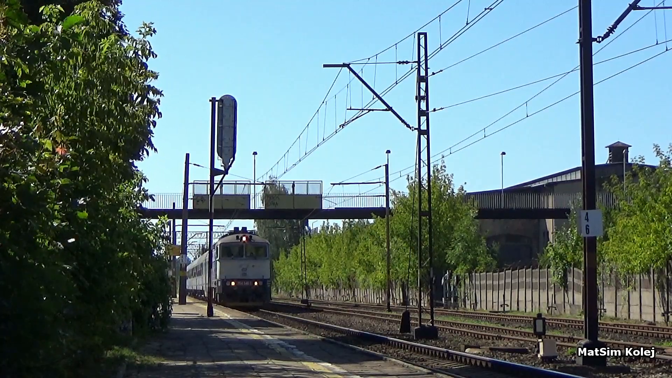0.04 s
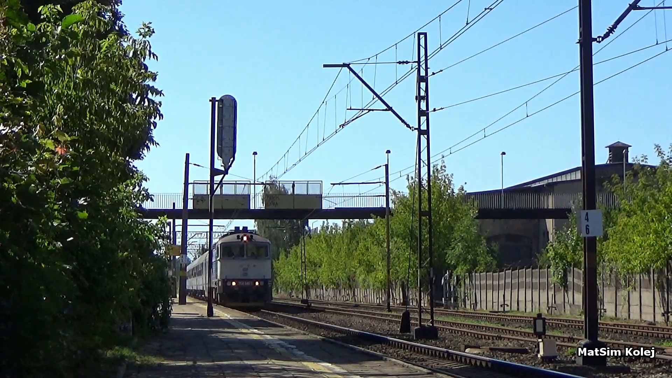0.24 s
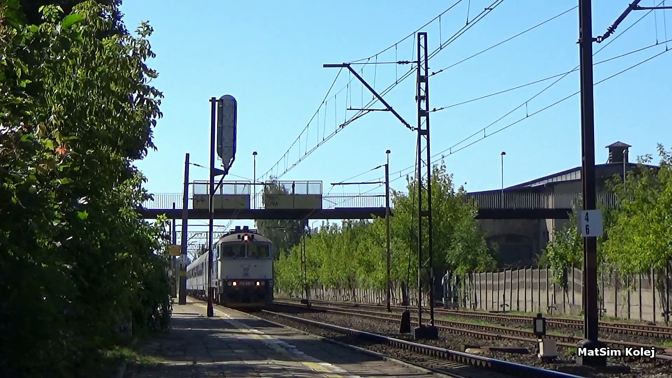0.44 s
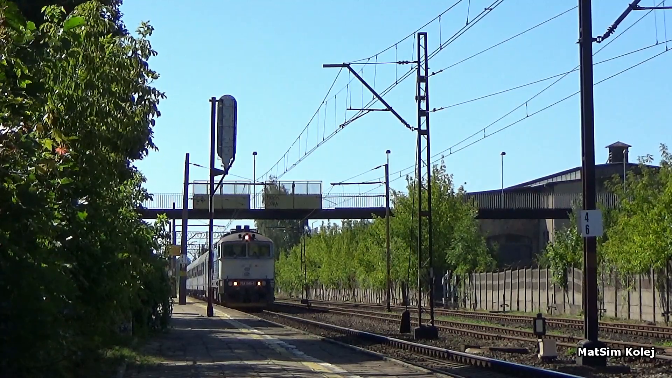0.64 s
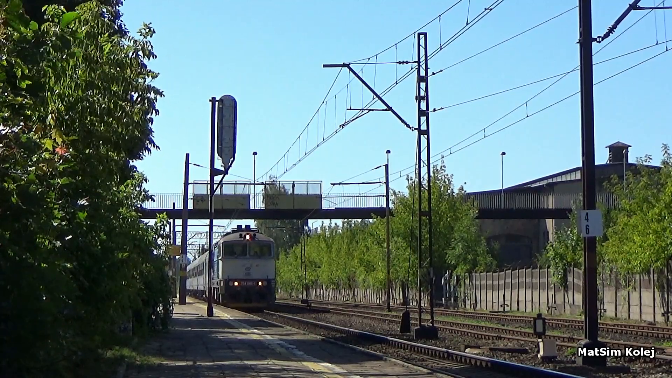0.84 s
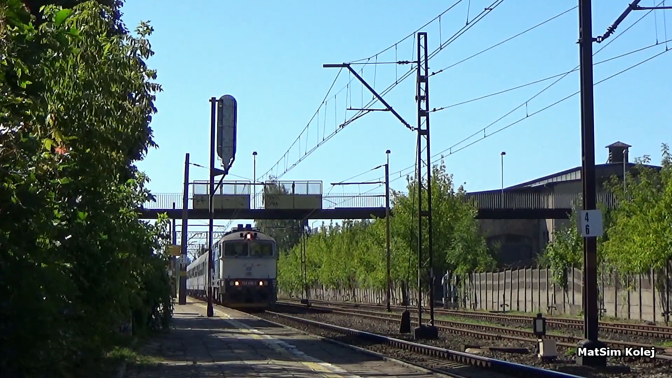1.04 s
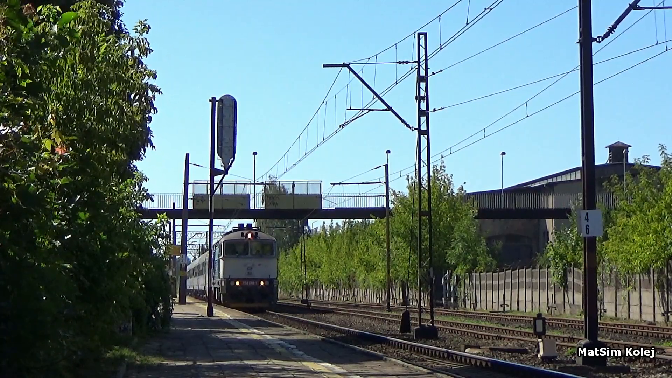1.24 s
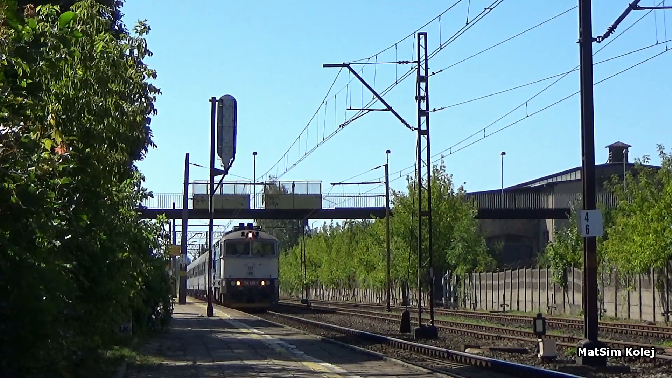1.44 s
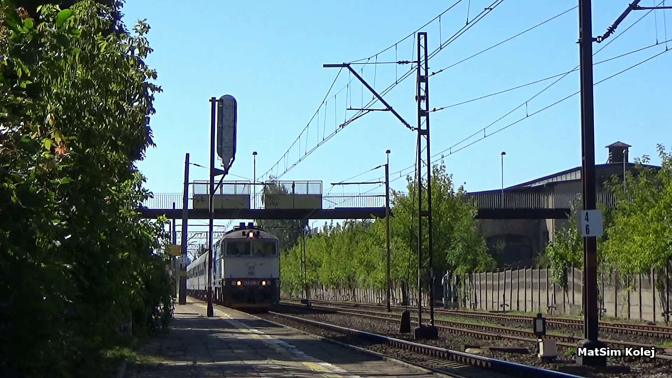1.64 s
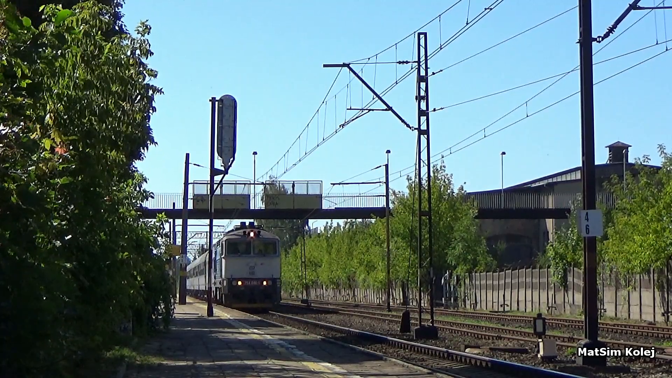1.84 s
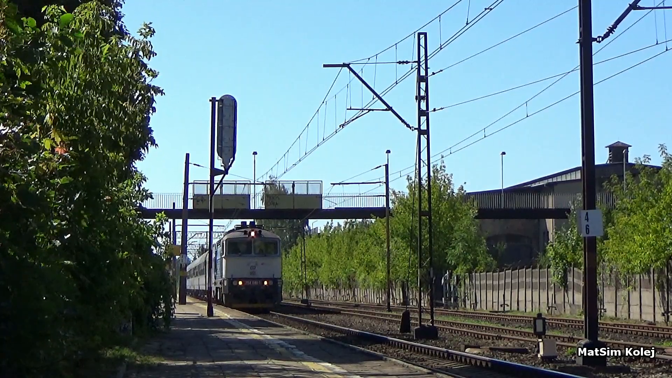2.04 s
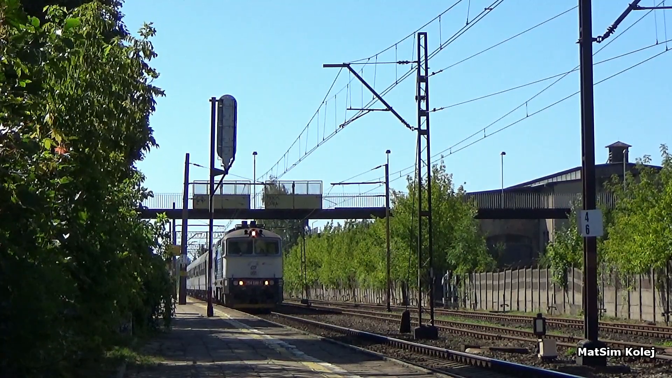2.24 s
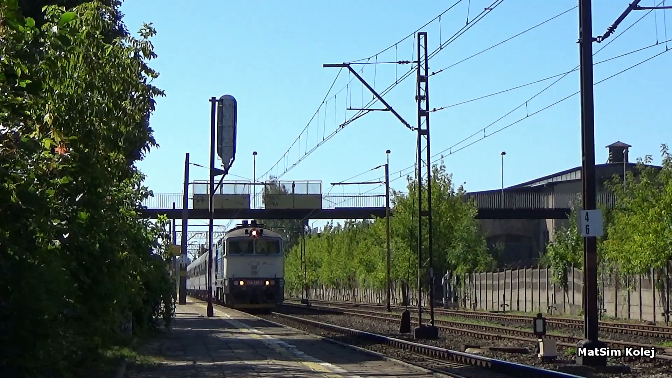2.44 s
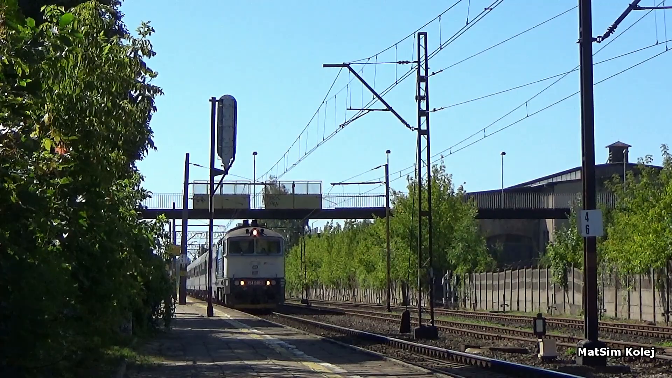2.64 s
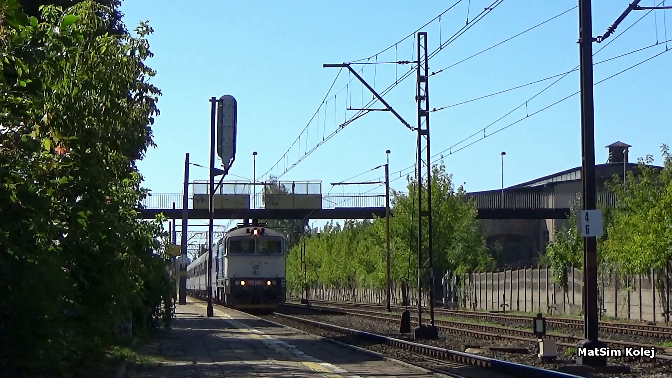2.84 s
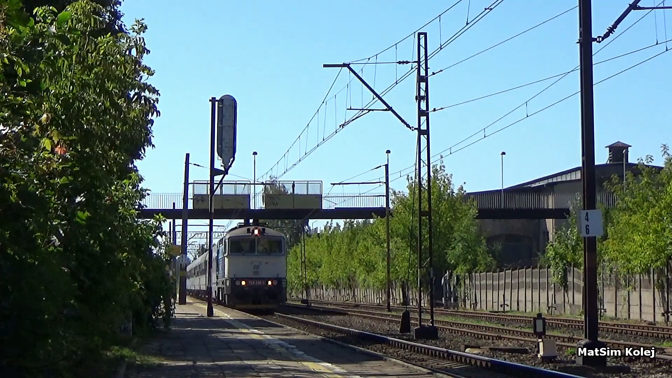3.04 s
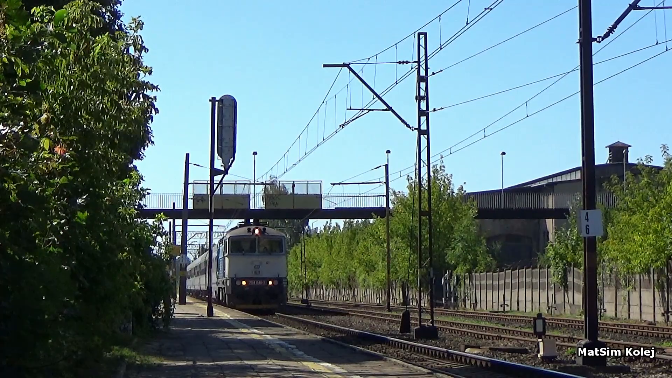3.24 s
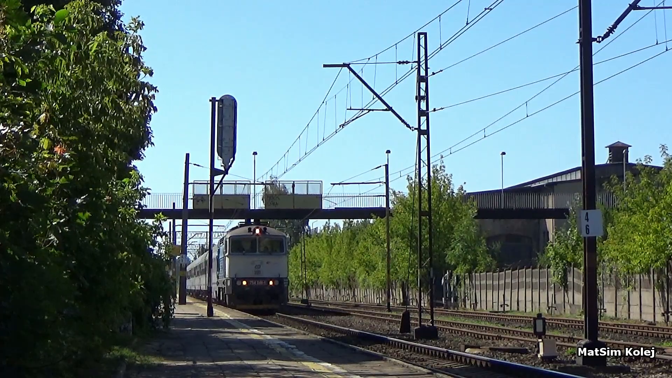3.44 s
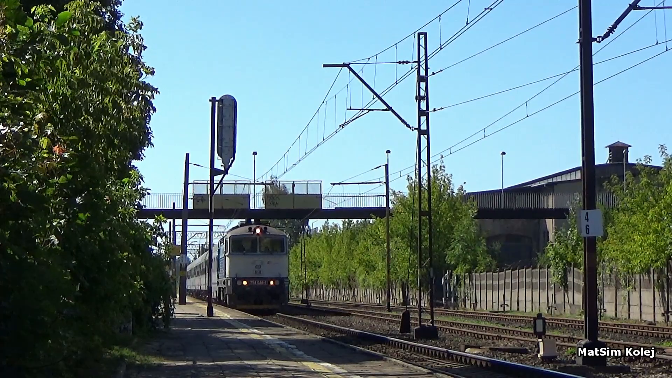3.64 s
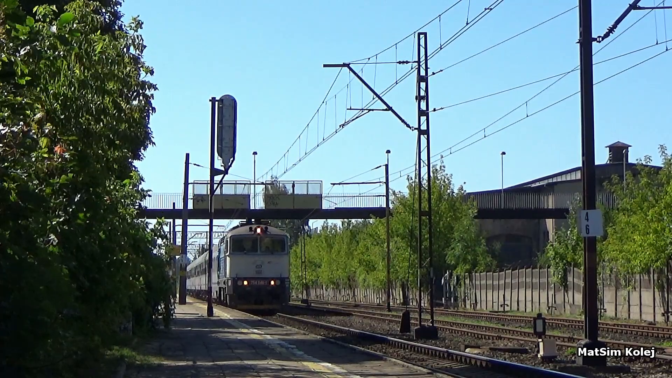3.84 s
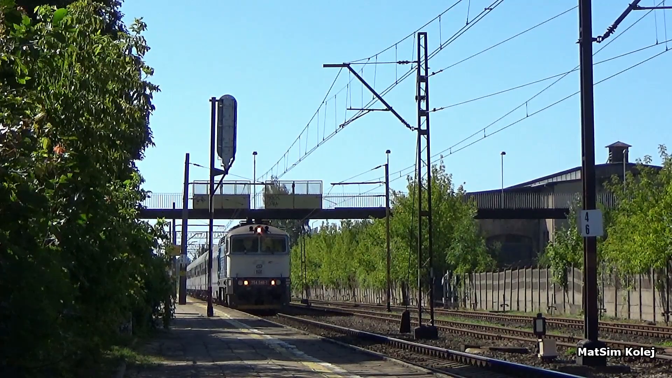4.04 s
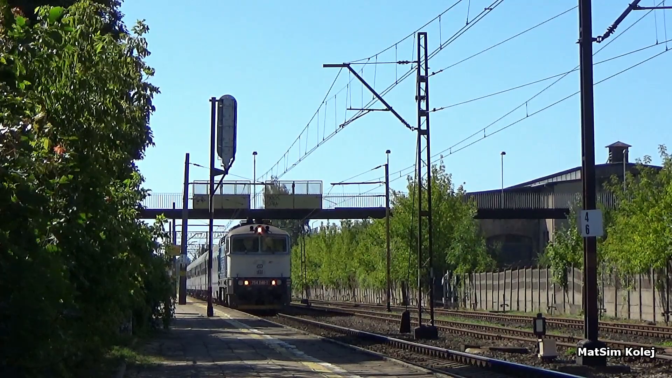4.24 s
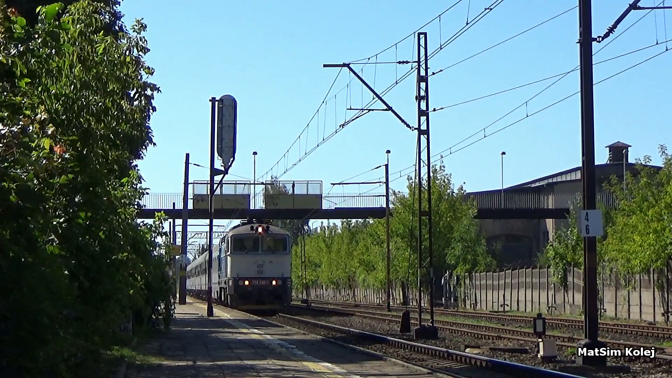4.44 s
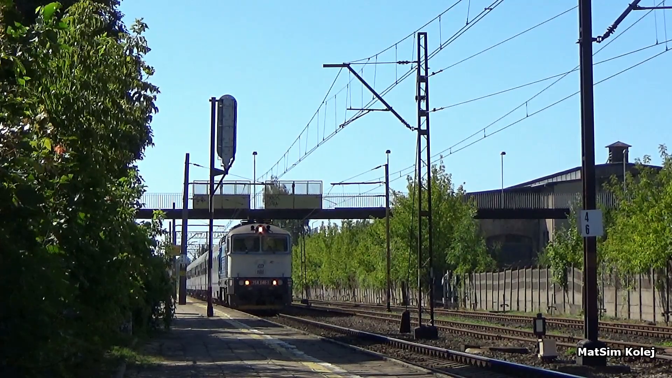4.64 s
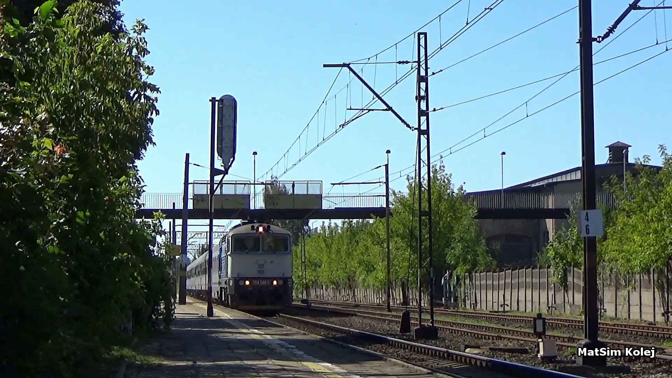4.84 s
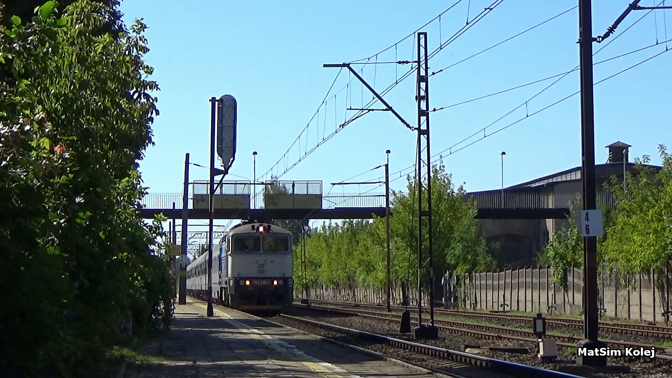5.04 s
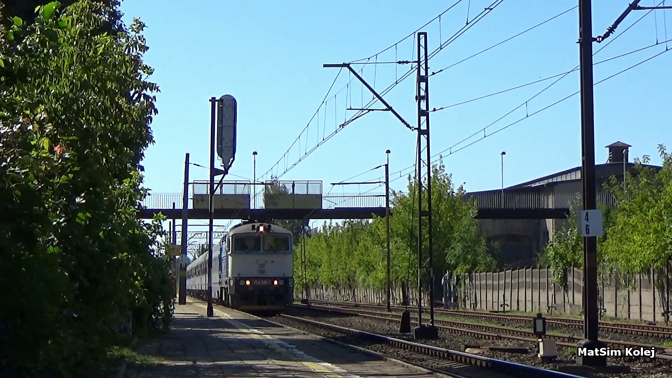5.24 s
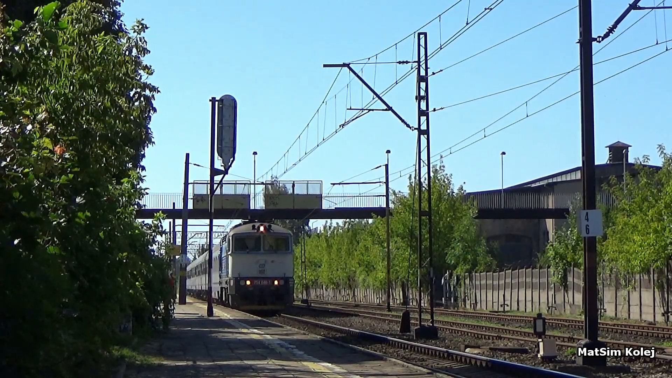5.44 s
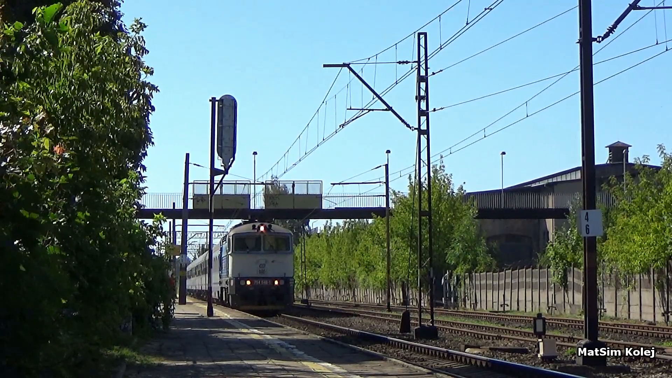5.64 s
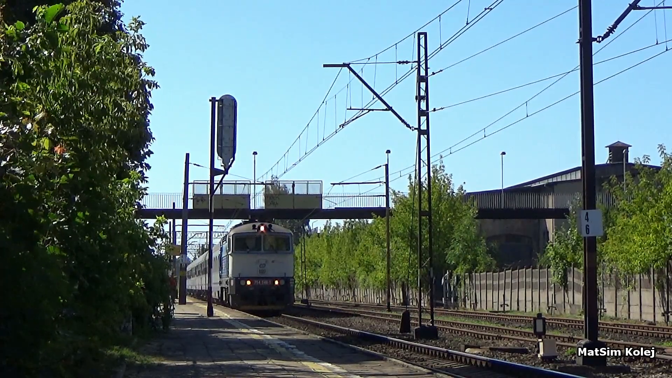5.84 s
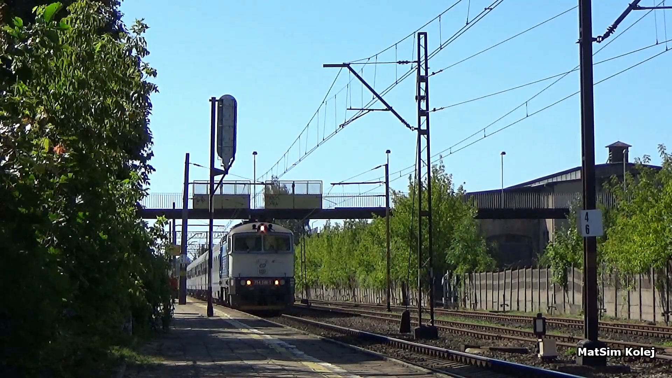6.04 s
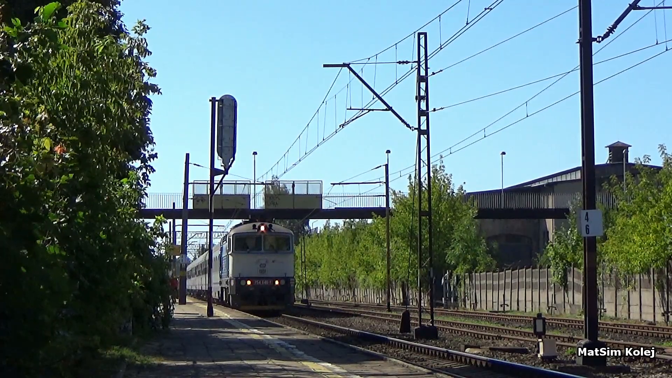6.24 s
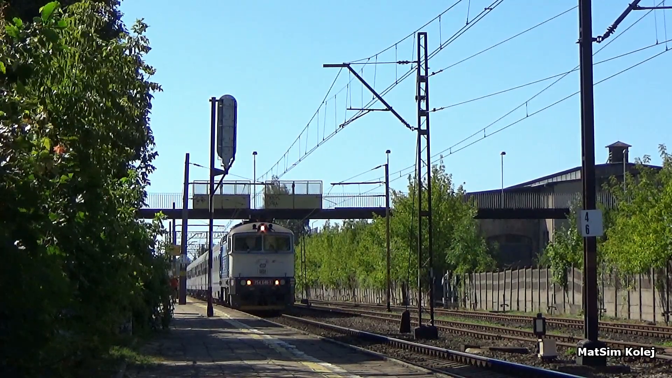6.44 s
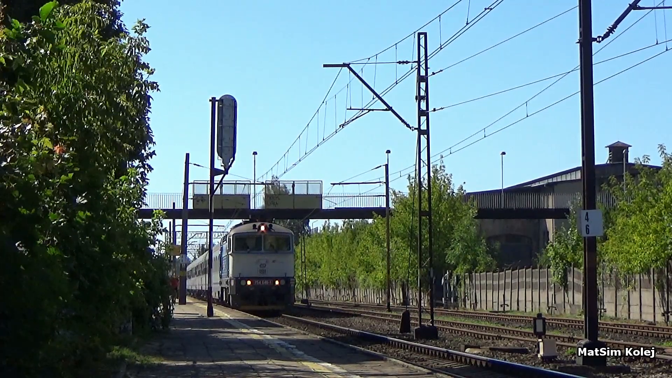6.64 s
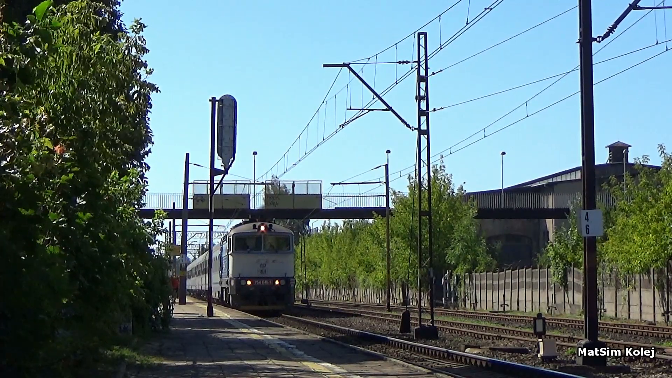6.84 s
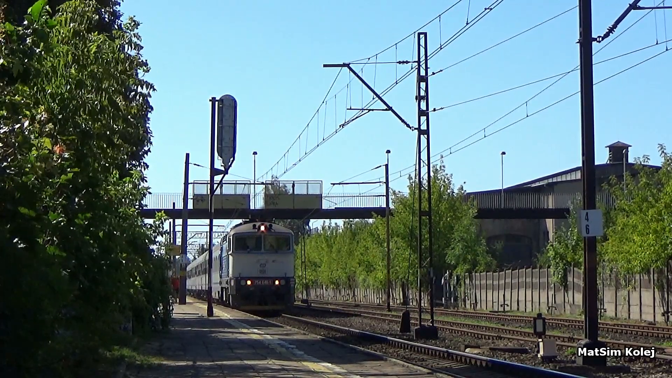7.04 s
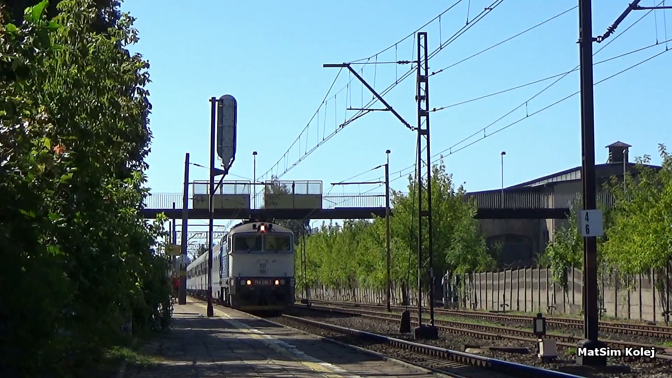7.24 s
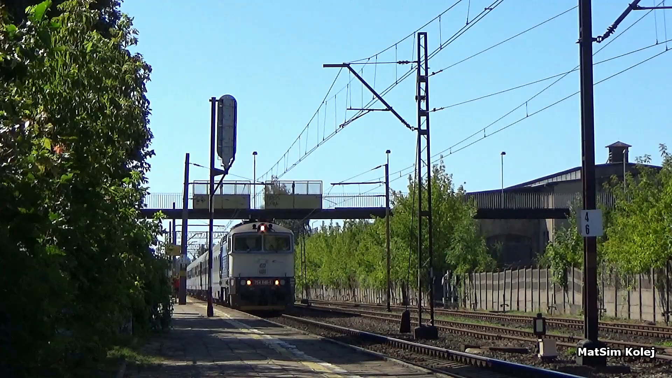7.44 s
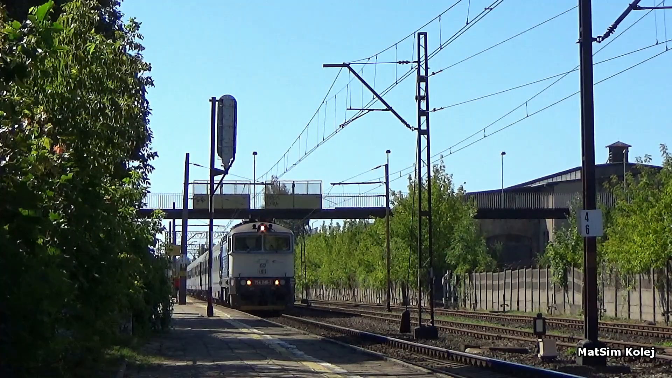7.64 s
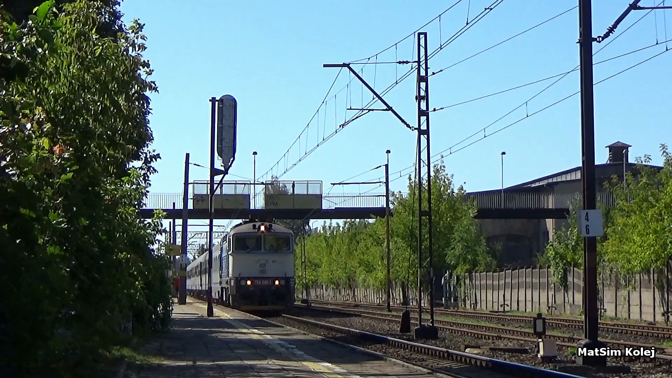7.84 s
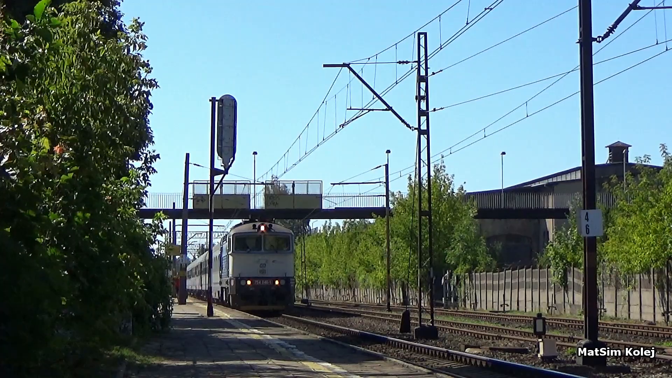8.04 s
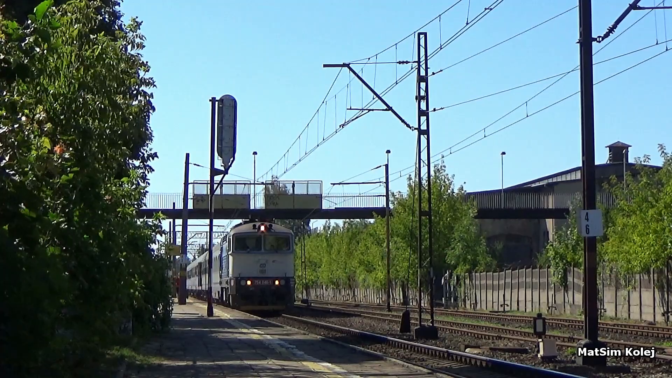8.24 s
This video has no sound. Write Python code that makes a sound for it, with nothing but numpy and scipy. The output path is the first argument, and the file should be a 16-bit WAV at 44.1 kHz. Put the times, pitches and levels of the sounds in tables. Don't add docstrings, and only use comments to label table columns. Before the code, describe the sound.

Steady piercing wheel squeal from a braking train shimmers and beats over soft engine roar, then dies into small creaks, with wind thumps on the microphone.

```python
import sys
import numpy as np
from scipy import signal
from scipy.fft import rfft, irfft, next_fast_len
from scipy.io import wavfile
from scipy.ndimage import uniform_filter1d

SR = 44100
rng = np.random.default_rng(int(sys.argv[2]) if len(sys.argv) > 2 else 0)


def attenuation_scalar(level_db):
    decades = np.asarray(level_db, float) / 20
    return 10 ** decades


def digitize_waveform(pressure):
    field = np.atleast_2d(pressure).T
    bounded = np.clip(field, -1, 1)
    quanta = np.round(bounded * 32767).astype(np.int16)
    wavfile.write(sys.argv[1], SR, quanta)


N = 366030
STEP = 30
TIME = np.arange(N) / SR
SLOW = TIME[::STEP]

# start [s], peak [dB], length [s], brightness [dB].
PUFFS = [(0.315, -32, 0.019, -16), (0.554, -30, 0.021, -19), (2.801, -32, 0.024, -11),
         (2.938, -22, 0.014, -12), (3.003, -21, 0.023, -7.5), (3.028, -23, 0.035, -4),
         (3.156, -29.5, 0.036, -2), (3.503, -20, 0.041, -18), (3.546, -15, 0.035, -7),
         (3.954, -26, 0.015, -6), (4.005, -29, 0.028, -18), (4.276, -28, 0.025, -14),
         (4.364, -27, 0.02, -15), (4.469, -23, 0.028, -23), (4.606, -29.5, 0.027, 2),
         (4.708, -25.5, 0.033, 2), (4.902, -13, 0.028, -7), (5.09, -34, 0.024, -7), (5.26, -43, 0.027, -8),
         (5.357, -37, 0.022, 1), (6.285, -31.5, 0.037, -10)]
# centre [s], length [s], level [dB].
GUSTS = [(.11, 0.047, -47), (.23, 0.043, -46), (.34, 0.045, -40), (.58, 0.085, -35), (1.2, 1.2, -58),
         (2.24, 0.29, -57), (2.72, 0.055, -54), (2.94, .28, -37.5), (3.18, 0.061, -28), (3.38, 0.12, -38),
         (3.55, 0.13, -33), (3.72, 0.055, -39), (3.87, 0.17, -41), (4.03, 0.048, -44), (4.12, 0.1, -39.5),
         (4.3, 0.067, -38), (4.4, 0.071, -32.5), (4.47, .06, -42), (4.725, .05, -35), (4.91, 0.059, -33.5),
         (5.07, 0.11, -44), (5.23, 0.072, -41.5), (5.38, 0.057, -47), (6.3, 0.057, -44.5)]
CALM_DB = -65.5
# frequency [Hz], level [dB].
BUFFET_SPECTRUM = [(20, -44), (50, -21), (110, -1.5), (200, -1.5), (330, -8.5), (600, -25.5), (1000, -54)]
# frequency [Hz], level [dB per Hz].
PUFF_EDGE_SPECTRUM = [(150, -28), (400, 0), (700, -7), (1500, -40)]
# frequency [Hz], likeness [0-1].
TRAIN_LIKENESS = [(60, 0.95), (180, 1), (550, 0.91), (1650, 0.79), (4970, 0.98), (15000, 0.43)]

# time [s], roar level [dB].
ENGINE_LEVEL = [(0, -36), (1.5, -38.5), (3.0, -39.5), (5.7, -40), (7.12, -39), (8.09, -41.5), (8.3, -42)]
# frequency [Hz], level [dB].
ROAR_SPECTRUM = [(30, -21), (60, -17), (150, -9.5), (350, -9), (550, -6), (1000, -2), (1600, -4.5),
                 (2500, -8), (4000, -14.5), (6500, -25), (10500, -28.5), (14000, -38), (15600, -34)]
# frequency [Hz], level [dB].
HISS_SPECTRUM = [(800, -31), (1800, -12.5), (3000, -3), (4000, -3.5), (4350, 1), (4900, 0), (5200, -7),
                 (7500, -20.5), (10500, -27), (13300, -58), (15500, -48)]
# order [multiple of
# rotation], level [dB].
HUM_ORDERS = [(4, -10), (5, -9), (6.2, -9), (7, -9), (8, -9), (9, -3)]
HUM_HZ = 126.85
# time [s], hum level [dB].
GENERATOR_LOAD = [(0, -60), (3.4, -58), (4.3, -52.5), (4.8, -47.5), (6.3, -47), (8.3, -49.5)]
# order [multiple], centre [s], length [s], gain [dB].
HUM_SWELLS = [(9, 5.1, .9, 5), (9, 5.95, .4, 4), (9, 6.85, .3, 5), (8, 3.9, .5, 12), (8, 6.7, 1, 11),
              (7, 4, .8, 14), (7, 6.6, .9, 11), (5, 4.6, 1.2, 4), (4, 7.8, 1.2, 9), (6.2, 5.9, .6, 2),
              (6.2, 7.4, .7, 7)]
# time [s], half-pitch stick-slip [dB], block hiss [dB].
RUBBING = [(0, -64, -50.5), (1.45, -54.5, -49), (1.8, -48, -44), (2.1, -47.5, -46.5), (2.4, -54, -48.5),
           (2.75, -51.5, -48), (3.2, -53, -46.5), (3.45, -39, -45), (3.9, -38, -44.5), (4.55, -47.5, -49.5),
           (5.0, -42, -46.5), (5.65, -40.5, -48.5), (5.92, -42.5, -45), (6.15, -49.5, -48),
           (6.4, -38.5, -47), (6.75, -43.5, -44.5), (7.04, -45, -51), (7.45, -68, -66)]

# centre [s], length [s], frequency [Hz], level [dB].
SQUEAKS = [(3.42, .13, 3560, -44), (3.61, .08, 3430, -46), (3.65, 0.1, 2697, -42), (3.82, 0.07, 3430, -47),
           (4.13, .12, 3489, -43), (4.555, 0.12, 3400, -42.5), (6.071, 0.14, 3200, -40),
           (6.35, 0.18, 3398, -44), (6.645, .15, 2650, -46), (6.7, .2, 3180, -41), (6.738, 0.17, 2792, -43),
           (6.77, 0.11, 2790, -41), (6.6, .2, 3800, -51), (6.58, 0.11, 2800, -48),
           (6.759, 0.31, 1594, -45.5), (6.95, 0.27, 1785, -47), (7.06, .09, 3117, -42),
           (7.154, 0.15, 1500, -50), (7.37, .12, 4520, -45), (7.38, .2, 1500, -51),
           (7.497, 0.054, 2927, -48), (7.71, 0.0376, 3610, -45.5), (7.726, 0.039, 3810, -44),
           (6.32, .18, 3950, -45), (6.623, .25, 3900, -47), (6.33, 0.13, 3520, -46),
           (6.955, 0.1003, 3350, -47), (3.9, 0.21, 2720, -50), (7.78, 0.054, 5040, -50.5)]
# centre [s], length [s], frequency [Hz], level [dB].
PURE_NOTES = [
    (6.865, 0.26, 3440, -33.5),
    (7.03, .25, 3700, -47),
    (6.11, .06, 3505, -43),
    (6.33, .18, 3200, -43.5),
    (7.87, .33, 1573, -47.5),
]
# centre [s], length [s], frequency [Hz], width [Hz], level [dB].
SCRAPES = [
    (5.414, .12, 2895, 1610, -35),
    (6.0, .2, 3200, 700.8, -46),
    (7.494, .047, 1401, 900, -36.5),
    (8.27, 0.092, 2777, 300, -51),
]
# frequency [Hz], width [Hz], level [dB].
CREAK_MODES = [(3730, 210, -46.5), (4480, 60, -56), (5650, 80, -61), (6200, 60, -64), (6880, 60, -67),
               (7802, 48, -57), (8700, 60, -63)]

# frequency [Hz], width of the group [Hz], steadiness [0-1], song group [index],
# level [dB], left lead [radians], left over right [dB].
DISC_MODES = [(3437, 30, .35, 0, -5, .23, -3.5), (8150, 110, .16, 1, 4, -1.86, 7),
              (8230, 50, .2, 1, -2, -1.4, 7), (8010, 100, .05, 1, -6.5, 1, -3),
              (7770, 25, .4, 4, -1, -.6, 6), (12836, 25, .93, 2, 3.5, .08, -1),
              (12650, 270, .05, 2, -16, .15, 0), (13900, 300, .05, 3, 2, 0, 0),
              (12450, 300, .15, 3, 3, 0, 0), (11740, 70, .3, 3, -3, 0, 0), (14750, 250, .05, 3, -14, 0, 1),
              (13978, 20, .8, 5, 2, 0, 0), (13700, 90, .1, 3, -3, 0, 0)]
# centre [s], length [s], level [dB].
SONGS_LOW = [(2.6, .3, -56), (3.57, .3, -59), (3.82, .07, -42), (4.07, .15, -49), (4.47, .1, -55),
             (4.798, .1, -42), (4.95, 0.12, -36), (5.103, 0.088, -37.5), (5.4, 0.14, -41),
             (5.95, 0.41, -43.5), (6.35, .12, -47), (6.63, .15, -47), (6.877, .16, -30)]
SONGS_MID = [(1.45, 0.45, -58), (3.12, 0.11, -49.5), (3.57, 0.38, -60), (3.82, 0.061, -56),
             (4.1, 0.13, -64), (4.6, 0.41, -67), (5.01, 0.069, -55), (5.48, 0.3, -59), (6.3, 0.55, -57.5),
             (6.74, 0.047, -49)]
SONGS_HIGH = [(1.3, .5, -65), (2.38, .3, -65), (3.2, .4, -67), (3.9, .4, -63), (4.36, .3, -52),
              (4.8, 0.34, -47.5), (5.2, 0.22, -54), (5.53, 0.35, -43), (5.95, 0.3, -59), (6.58, .06, -60)]
SONGS_TOP = [(1.38, 0.54, -63.5), (2.42, 0.45, -65.5), (3.15, 0.37, -59.5), (3.55, .4, -63), (4.4, .8, -67),
             (5.3, .6, -69.5), (5.8, 0.25, -63), (6.26, .3, -60)]
SONGS_LONE = [
    (5.502, .2, -60),
    (6.21, 0.14, -54.5),
    (6.7, 0.19, -55),
]
SONGS_THIN = [
    (6.0, .7, -65),
]
MURMUR_DB = [-57.5, -61.5, -74, -72.5, -79, -84]

# time [s], level [dB].
SQUEAL_LEVEL = [(0, -38), (.4, -29.5), (.87, -29.5), (1.2, -27.5), (1.4, -27.5), (1.76, -23), (2.15, -26.5),
                (2.6, -27.5), (3.1, -23), (3.45, -21.5), (4.06, -19), (4.3, -23), (4.7, -23), (5.05, -18),
                (5.65, -23.5), (6.98, -22.5), (7.48, -42), (8.0, -71)]
# time [s], lowest [Hz], highest [Hz],
# place of the hardest grip [-1 to 1].
CROWD = [(0, 4520, 4772, 0.22), (.8, 4495, 4766, -0.096), (1.4, 4522, 4754, -0.064),
         (2.0, 4494, 4735, 0.00043), (2.5, 4516, 4748, 0.031), (3.0, 4542, 4744, -0.14),
         (3.5, 4518, 4733, 0.038), (4.3, 4521, 4711, -0.1), (5.0, 4541, 4685, -0.11),
         (5.8, 4571, 4688, -0.3), (6.4, 4560, 4652, -0.48), (8.0, 4590, 4665, -0.21)]
# centre [s], gain [dB].
GRABS = [(.53, 2), (2.0, 2.5), (2.05, -2.5), (2.12, 4.5), (2.56, -2), (2.94, 2), (2.99, -6.5), (3.12, 0.5),
         (3.33, -3), (3.39, 5), (3.57, 2.5), (4.141, -6.5), (4.45, -4.5), (4.68, -3), (4.72, 2.5),
         (4.918, 5), (5.12, 3.5), (5.23, -5), (5.26, 4), (5.32, -3), (5.38, 3.5), (5.77, -2.5), (5.81, 5),
         (6.02, 3.5), (6.28, -4), (6.37, 2.5), (6.44, 3), (6.51, 3), (6.6, 3), (6.73, 2.5)]
# multiple of half pitch, level [dB].
STRONG_OVERTONES = [(4, -31), (6, -50.5)]
# multiple of half pitch, level [dB].
HALF_PITCH_TONES = [(1, 3), (3, -6), (5, -31)]
# centre [s], length [s], gain [dB].
LOWEST_WHEEL = [
    (.6, 1.2, -9),
    (1.9, 0.5, 0),
    (2.8, .6, -1),
    (3.95, 0.85, 11),
    (5.0, 0.36, -13),
    (5.798, 0.44, -2),
    (6.403, 0.12, 1),
]
# centre [s], length [s], gain [dB].
HIGHEST_WHEEL = [
    (3.4, .5, 9),
    (6.55, 0.5, 8.5),
    (7.3, 0.59, 22),
]


def unit(x):
    return x / np.sqrt(np.mean(x ** 2) + 1e-20)


def along(points, hz):
    f, v = np.transpose(points)
    return np.interp(np.log(hz + 1), np.log(f + 1), v)


def curves(rows, t=TIME):
    s, *columns = np.transpose(rows)
    return [np.interp(t, s, column) for column in columns]


def wobble(rate, t=TIME):
    knots = rng.standard_normal(3500)
    return np.interp(t * rate, np.arange(len(knots)), knots)


def bumps(rows, sizes):
    return sum(size * 2. ** (-(2 * (SLOW - row[0]) / row[1]) ** 2) for row, size in zip(rows, sizes))


def swells(rows, floor_db):
    return attenuation_scalar(floor_db) + bumps(rows, attenuation_scalar([row[2] for row in rows]))


def rush(spectrum, likeness, patchy_db):
    z = signal.stft(rng.standard_normal((2, N)), nperseg=512)[2]
    patches = uniform_filter1d(rng.standard_normal(z.shape[1:]), 6, 0)
    patches = uniform_filter1d(patches, 14, 1)
    pair = signal.istft(z * attenuation_scalar(patchy_db * unit(patches)), nperseg=512)[1][:, :N]
    size = next_fast_len(N)
    hz = np.fft.rfftfreq(size, 1 / SR)
    turn = np.arccos(np.clip(along(likeness, hz), -1, 1)) / 2
    colored = rfft(pair, size) * attenuation_scalar(along(spectrum, hz))
    mid, side = irfft(colored * [np.cos(turn), np.sin(turn)], size)[:, :N]
    return unit(np.array([mid + side, mid - side]))


def swing_of(n, width_hz, rate):
    push = rng.standard_normal(n) + 1j * rng.standard_normal(n)
    pole = np.exp(-np.pi * abs(width_hz) / rate)
    return signal.lfilter([1], np.convolve([1, -pole], [1, -pole]), push)


def carry(swings):
    spectrum = np.zeros((2, N // 2 + 1), complex)
    for hz, swing in swings:
        first = round(hz * N / SR) - len(SLOW) // 2
        spectrum[:, first:first + len(SLOW)] += np.fft.fftshift(np.fft.fft(swing), axes=-1)
    return irfft(spectrum, N) * STEP / np.sqrt(2)


def wind():
    puff, edge = np.zeros((2, len(SLOW)))
    for s, db, length, bright_db in PUFFS:
        bump = np.exp(-((SLOW - s - length / 2) / (0.31 * length)) ** 2)
        puff += attenuation_scalar(db - 13.0) * bump
        edge += attenuation_scalar(db + bright_db - 10.0) * bump
    puff, edge = np.interp(TIME, SLOW, puff), np.interp(TIME, SLOW, edge)
    port_likeness = [(40, 0.97), (150, 0.82), (400, 0.17)]  # (Hz, likeness)
    steady = np.interp(TIME, SLOW, swells(GUSTS, CALM_DB)) * attenuation_scalar(3.7 * wobble(35) - 4.0)
    buffet = rush(BUFFET_SPECTRUM, port_likeness, patchy_db=2.5)
    power = uniform_filter1d(np.mean(buffet ** 2, 0) + 0.06, size=2600)
    buffet = buffet / power ** 0.32
    return (steady + puff) * buffet + edge * rush(PUFF_EDGE_SPECTRUM, port_likeness, patchy_db=2.0)


def engine_roar():
    roar_db = curves(ENGINE_LEVEL)[0] + 1.0 + 0.28 * wobble(7.3)
    return attenuation_scalar(roar_db) * rush(ROAR_SPECTRUM, TRAIN_LIKENESS, patchy_db=0.84)


def generator_hum():
    phase = 2 * np.pi * np.cumsum(HUM_HZ + 0.252 * wobble(2.5)) / SR
    hum = np.zeros(N)
    for order, db in HUM_ORDERS:
        own_swells = [row for row in HUM_SWELLS if row[0] == order]
        swell_db = sum(bumps([row[1:]], [row[3]]) for row in own_swells) + np.zeros(len(SLOW))
        level_db = db + np.interp(TIME, SLOW, swell_db) + 1.3 * wobble(3)
        hum += attenuation_scalar(level_db) * np.sin(order * phase)
    return attenuation_scalar(curves(GENERATOR_LOAD)[0]) * hum


def block_hiss():
    hiss_db = curves(RUBBING)[1] + 9 + 0.81 * wobble(8.2)
    return attenuation_scalar(hiss_db) * rush(HISS_SPECTRUM, TRAIN_LIKENESS, patchy_db=1.0)


def squeaks():
    rows = [(s, length, hz, 72, db) for s, length, hz, db in SQUEAKS]
    rows += [tuple(row) for row in SCRAPES]
    rows += [(s, length, hz, 7.7, db) for s, length, hz, db in PURE_NOTES]
    creak_s, creak_length_s = 8.22, 0.14
    rows += [(creak_s, creak_length_s, *mode) for mode in CREAK_MODES]
    out = np.zeros(N + SR)
    for s, length, hz, width_hz, db in rows:
        tone = np.exp(2j * np.pi * hz * TIME[:SR // 2])
        ring = unit(np.real(swing_of(SR // 2, width_hz, SR) * tone))
        ring = ring[-int(1.5 * length * SR):]
        first = int(s * SR) - len(ring) // 2
        out[first:][:len(ring)] += attenuation_scalar(db + 0.5) * np.hanning(len(ring)) * ring
    return out[:N]


def disc_songs():
    songs = [SONGS_LOW, SONGS_MID, SONGS_HIGH, SONGS_TOP, SONGS_LONE, SONGS_THIN]
    levels_db = [20 * np.log10(swells(rows, db)) for rows, db in zip(songs, MURMUR_DB)]
    hold_s = 7.15
    stopped = np.clip((hold_s - SLOW) / 0.5, 0, 1)
    swings = []
    for hz, width_hz, steady, group, db, lead, pan_db in DISC_MODES:
        ears = (attenuation_scalar(pan_db) * np.exp(1j * lead)) ** np.array([[.5], [-.5]])
        noisy = swing_of(len(SLOW), width_hz, SR / STEP)
        wander_hz = 0.1013 * width_hz * wobble(3.0, SLOW)
        core = np.exp(2j * np.pi * np.cumsum(wander_hz) * STEP / SR)
        level_db = levels_db[int(round(group))]
        loudness = np.clip((level_db - level_db.max() + 32) / 9, 0, 1)
        steady = np.clip(steady, 0, 1) * loudness
        swing = np.sqrt(steady) * core + np.sqrt(1 - steady) * noisy / np.std(noisy)
        swings.append((hz, stopped * attenuation_scalar(level_db + db) * ears * swing))
    return carry(swings)


def wheel_squeal():
    half_hz = 2310
    count = 14
    place = np.linspace(-1, 1, count)[:, None]
    outermost = np.abs(place) == 1
    low_hz, high_hz, core = curves(CROWD, SLOW)

    def chance(rate):
        return np.array([wobble(rate, SLOW) for _ in place])

    drift_hz = 6 * (chance(2.5) + 1.5 * chance(25)) * (1.6 + 0.3992 * place - 1.1 * outermost)
    hz = (low_hz * (1 - place) + high_hz * (1 + place)) / 2 + drift_hz
    turns = np.cumsum(hz / 2 - half_hz, 1) * STEP / SR
    phase = 2 * np.pi * (turns + rng.random((count, 1)))
    ears = attenuation_scalar(1.0 * np.cos(2.29 * np.arange(count)) * np.array([[1], [-1]]))

    def crowd(k, weight, pan, rough):
        grip = attenuation_scalar(3 * chance(40) + 2.3 * chance(1.5395))
        slip_phase = k * phase + rough * (chance(90) + 0.5 * chance(300))
        swing = pan @ (weight * grip * np.exp(1j * slip_phase))
        power = uniform_filter1d(np.mean(np.abs(swing) ** 2, 0), size=110)
        return swing / np.sqrt(power + 1e-9)

    lowest_db = -0.2 + bumps(LOWEST_WHEEL, [row[2] for row in LOWEST_WHEEL])
    highest_db = bumps(HIGHEST_WHEEL, [row[2] for row in HIGHEST_WHEEL])
    share_db = -12 * np.abs(place - core) ** 0.42 - 4.4 * np.clip(place - .5, 0, 1)
    share = attenuation_scalar(share_db + lowest_db * (place == -1) + highest_db * (place == 1))
    hard = np.exp(-((place - core + 0.23) / 0.8) ** 2)

    half_db = curves(RUBBING, SLOW)[0]
    bite_db = np.minimum(0.77 * (half_db + 49), 0)
    patchy_db = 1.4 * wobble(7, SLOW) + 1.3 * wobble(22, SLOW)
    stopped = np.clip((SQUEAL_LEVEL[-1][0] - SLOW) / .2, 0, 1)
    grab_db = bumps([(s, 0.057) for s, _ in GRABS], [db for _, db in GRABS])
    level = stopped * attenuation_scalar(curves(SQUEAL_LEVEL, SLOW)[0] + grab_db)

    scuff, half_scuff = 0.15, 1.32
    swings = [(2 * half_hz, level * crowd(2, share, ears, scuff))]
    for k, db in STRONG_OVERTONES:
        swing = crowd(int(k), hard, ears, scuff)
        swings.append((int(k) * half_hz, level * attenuation_scalar(db + bite_db) * swing))
    for k, db in HALF_PITCH_TONES:
        swing = crowd(int(k), hard ** (0.78 * k), ears ** 3, half_scuff / k)
        swings.append((int(k) * half_hz, stopped * attenuation_scalar(db + half_db + patchy_db) * swing))
    return carry(swings)


def scene():
    noise = engine_roar() + block_hiss() + generator_hum()
    train = noise + squeaks() + disc_songs() + wheel_squeal()
    return train * attenuation_scalar([[-.8], [.8]]) + wind()


def roll_off(x):
    return signal.sosfilt(signal.butter(12, 15970, fs=SR, output="sos"), x)


def record(dry):
    passed = np.fft.rfftfreq(N, 1 / SR) < 15720
    mix = irfft(rfft(dry) * passed, N)
    return roll_off(mix)


dry = scene()
out = record(dry)
digitize_waveform(out)
```